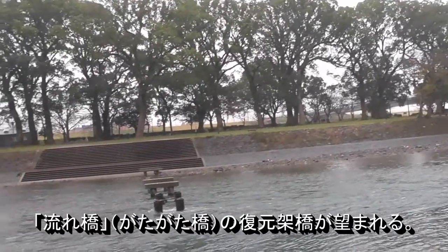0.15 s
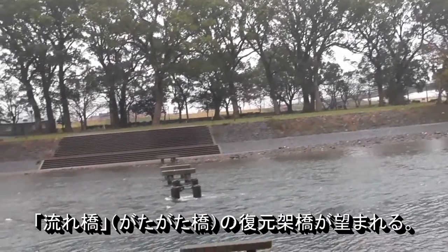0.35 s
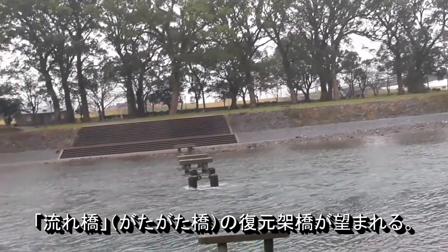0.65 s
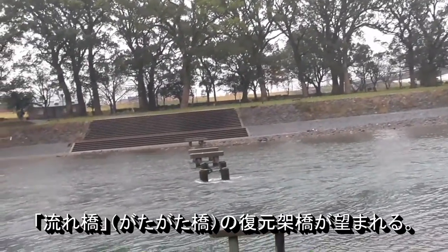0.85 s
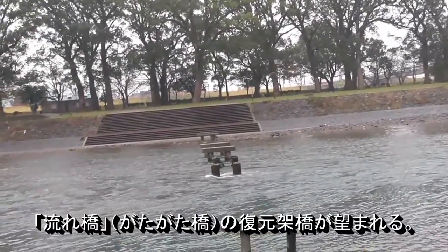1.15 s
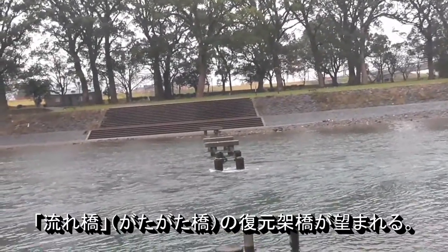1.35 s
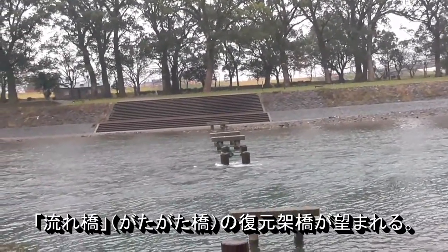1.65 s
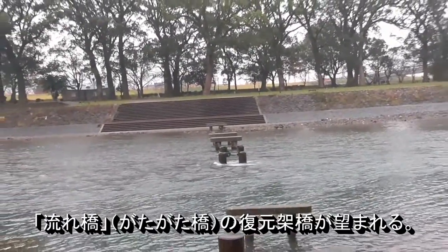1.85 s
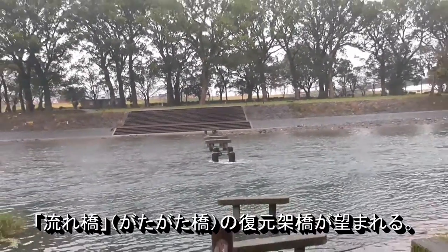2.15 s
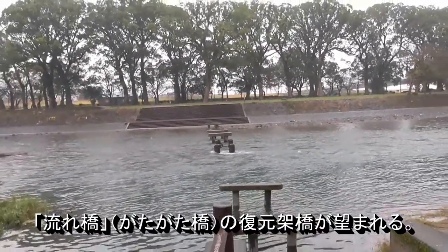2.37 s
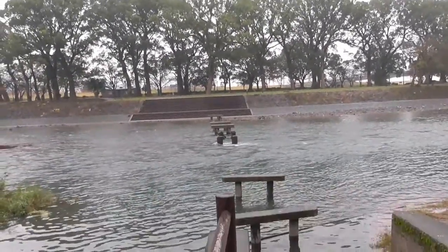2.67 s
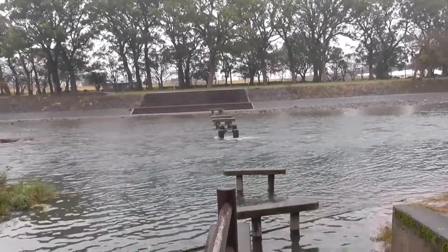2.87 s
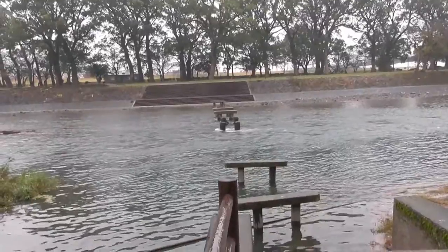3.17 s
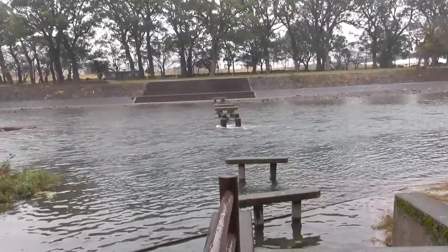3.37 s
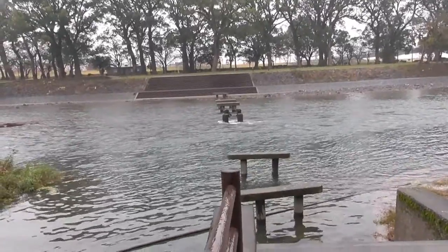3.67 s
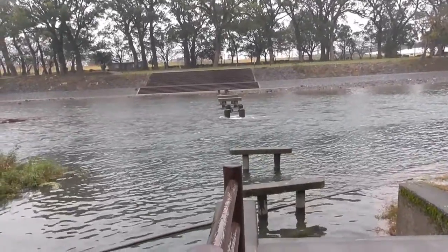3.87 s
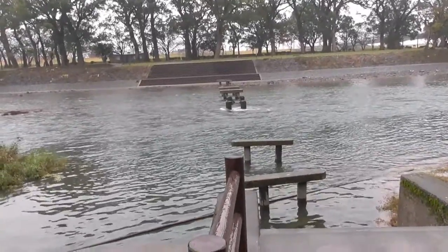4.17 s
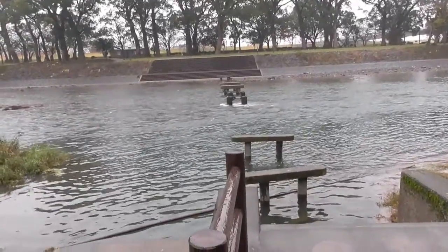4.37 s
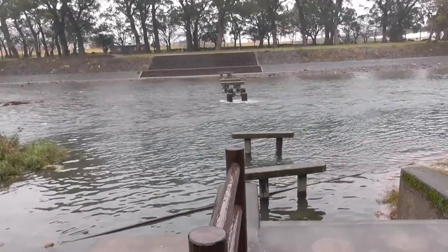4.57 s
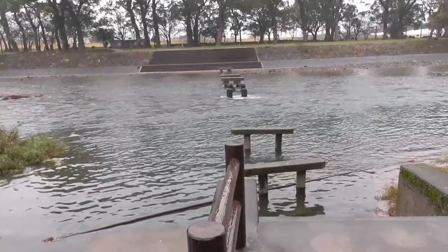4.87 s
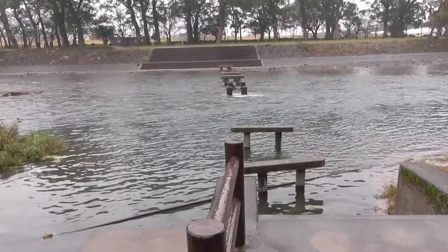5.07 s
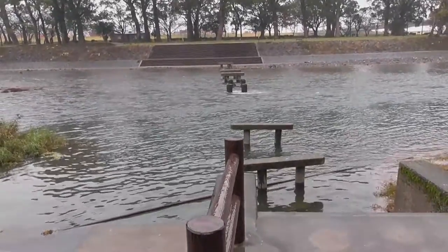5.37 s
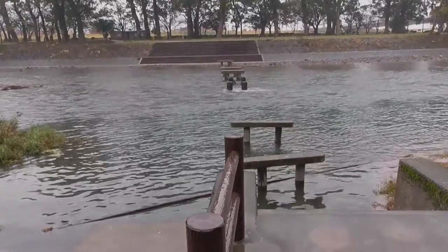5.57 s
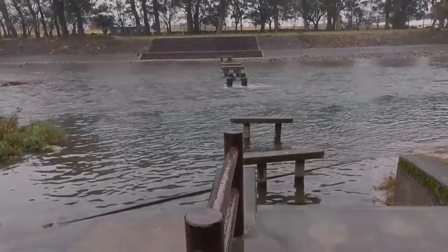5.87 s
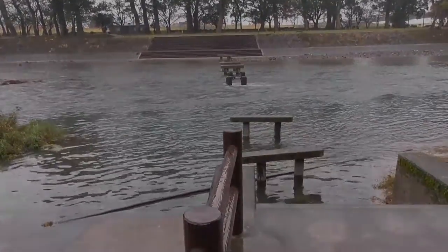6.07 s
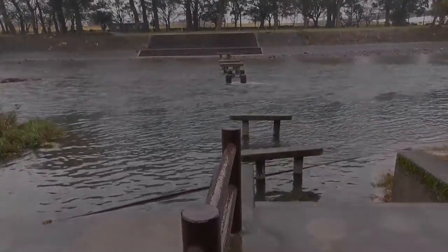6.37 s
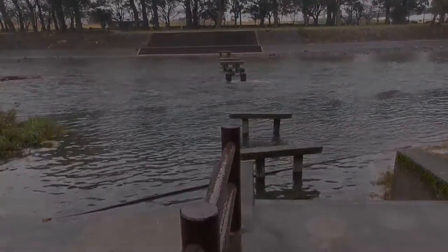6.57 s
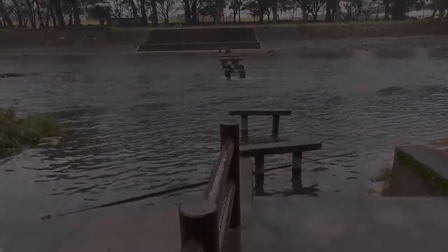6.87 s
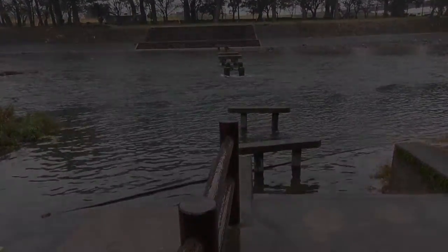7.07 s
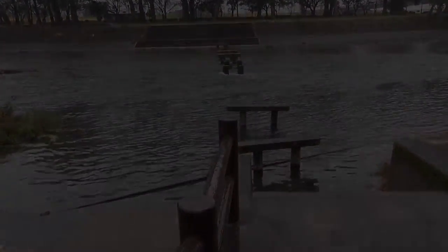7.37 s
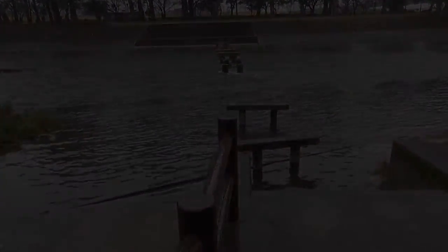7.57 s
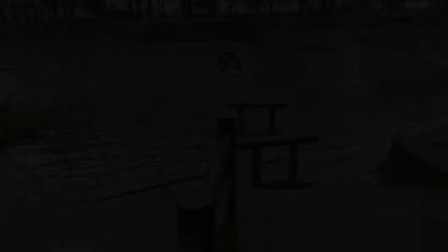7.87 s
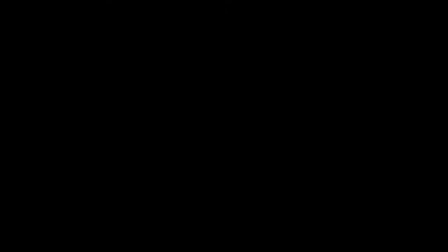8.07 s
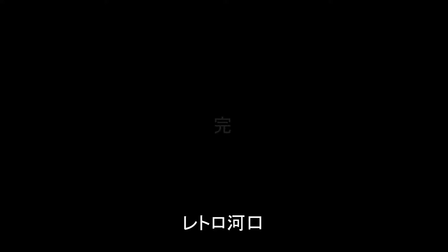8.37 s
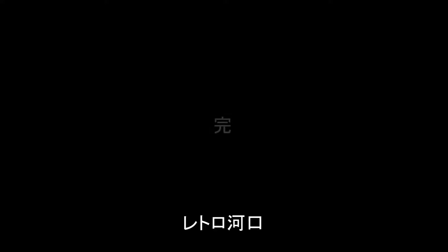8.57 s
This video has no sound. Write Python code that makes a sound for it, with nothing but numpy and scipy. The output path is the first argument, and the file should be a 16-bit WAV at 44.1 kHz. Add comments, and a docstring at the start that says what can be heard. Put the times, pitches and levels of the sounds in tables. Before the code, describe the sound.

A quiet river rushes evenly past posts after a half-second burst of rough handling knocks; one later bump, tiny drips, and a gradual fade-out.

```python
"""River past a footbridge

Broken water roars and spray fizzes round the posts: shaped noise mixed with swarms of ringing bubbles.
Drips ring with rising pitch, a far bird chirps upward, and a faint drone wavers below.
Fingers creak on a hand-held camera at the start and bump it once more later, by stick and slip;
its case ticks in short noise cracks, and soft bumps ring as tones. At the end everything fades out."""
import sys
import numpy as np
from scipy import signal
from scipy.fft import rfft, irfft, next_fast_len
from scipy.io import wavfile
from scipy.ndimage import uniform_filter1d

SR = 44100
rng = np.random.default_rng(int(sys.argv[2]) if len(sys.argv) > 2 else 0)


def inscribe(sig):
    """Save sig as 16-bit PCM at rate SR to the path in sys.argv[1].

    A 1-D sig is mono; a 2-D sig holds one channel per row.
    Samples are clipped to [-1, 1] before scaling.
    """
    pcm = np.round(np.clip(np.atleast_2d(sig).T, -1, 1) * 32767)
    wavfile.write(sys.argv[1], SR, pcm.astype(np.int16))


N = 384993

# relative spectrum of the broken water round the posts: frequency_hz, density_db (per Hz)
ROAR_SPECTRUM = [(15, -52.5), (25, -30), (87, -1.5), (117, -4), (148, -1), (257, -1.5), (399, -3), (531, 0),
                 (721, 0.5), (856, -2.5), (1350, -5), (1700, -16), (2140, -14.5), (2400, -25),
                 (3120, -49.5), (5280, -120)]
# relative spectrum of the spray above it: frequency_hz, density_db (per Hz)
SPRAY_SPECTRUM = [(1410, -36), (2400, -1.5), (3040, -1.5), (3480, 1), (4140, 1.5), (5040, -2), (6530, -12),
                  (8610, -7.5), (9920, -8.5), (11800, -13), (15200, -23), (15800, -24.5)]
# strength of the flow: time_s, roar_gain_db, spray_gain_db
FLOW_STRENGTH = [(0.47, -44.5, -56), (1.18, -44, -56.5), (2.88, -44.5, -57.0), (3.67, -44.5, -55),
                 (3.88, -43.5, -56), (4.08, -44, -56.5), (4.28, -42.5, -54.0), (4.47, -44.0, -55.5),
                 (5.78, -45.5, -57), (5.88, -44, -56.0), (6.17, -46, -57.5), (6.97, -46, -56.7),
                 (7.08, -42, -53.5), (7.58, -42, -54.5)]
# how alike the river is at the two microphone ports: frequency_hz, likeness (0-1)
PORT_LIKENESS = [(60, 0.95), (100, 0.95), (160, 0.89), (270, 0.84), (450, 0.84), (740, 0.9), (1220, 0.77),
                 (2000, 0.75), (3300, .74), (4500, 0.76), (5800, 0.49), (7200, 0.27), (9000, 0.33),
                 (15000, 0.29)]
# level difference of the ports: frequency_hz, left_minus_right_db
PORT_LEAN = [(60, -2.5), (92, -5.5), (140, -4.5), (210, -3.5), (330, -4.5), (500, -3), (770, -3.0),
             (1170, -3.0), (1790, 0), (2740, 0.5), (4190, 0.5), (6410, 0), (9810, -10.5), (15000, -5)]
# phase difference of the ports: frequency_hz, left_leads_rad
PORT_LEAD = [(100, 0), (1600, .1), (2400, -.1), (5200, -.6), (6900, -1.6), (9000, 0)]
# drags of a finger over the camera case, each a run of slips:
# start_s, length_s, slips_per_s, first_slip_db, swell_to_last_slip_db, sharpness_hz, grit_db
FINGER_DRAGS = [(.0425, .01, 160, -26, 1, 500, -55.5), (.0586, 0.015, 160, -10.5, -5, 480, -37),
                (.0774, 0.021, 218, -2.5, -6.5, 510, -34.5), (.0981, 0.0052, 415, -1.5, 5.5, 448, -28),
                (.1098, 0.04, 172, -16.5, 6, 586, -45.5), (.172, 0.035, 180, -20, 4.5, 310, -60),
                (.232, 0.035, 147, -17, -4, 260, -57.5), (.3052, 0.028, 97, -18, 1, 393, -60),
                (.3432, 0.013, 287, -14.5, 5.5, 430, -39.5), (0.356, .058, 218, -18.5, -1.5, 277, -44),
                (3.9043, .012, 95, -11.5, -14, 250, -65)]
# ticks of the camera case: start_s, relative_peak_db, t60_s, brightness_db_per_octave
CASE_TICKS = [(1.1923, -33, 0.0088, 1), (2.819, -41, 0.012, -2.5), (7.087, -40.5, .05, 6.5),
              (7.0934, -36, 0.015, 4), (7.301, -38, 0.003, -2), (7.3108, -37, 0.0072, 5)]
# colour of the case: frequency_hz, level_db
CASE_COLOUR = [(500, -10.5), (1500, 0.5), (2800, -2.5), (4200, 1.5), (6200, -3), (8000, -7.5), (12500, -10),
               (15500, -16.5)]
# soft bumps that reach both ports through the air: start_s, level_db, pitch_hz, t60_s
SOFT_BUMPS = [(1.2065, -19.5, 534, 0.012), (1.54, -24, 778, 0.03), (2.819, -24, 920, 0.013),
              (7.0865, -25, 540, 0.022), (7.111, -30, 610, .03)]
# single drips near the bank: start_s, level_db, starting_pitch_hz, t60_s
BANK_DRIPS = [(2.204, -52, 7350, 0.028), (3.4431, -36, 3900, 0.0072), (4.2303, -30.5, 3950, 0.0046),
              (5.233, -23.5, 4460, 0.0015), (5.538, -38, 1540, 0.023), (5.8167, -33.5, 3160, 0.0094),
              (6.609, -50, 6200, 0.041)]
# phrases of a small bird in the far trees: start_s, length_s, level_db, middle_pitch_hz
BIRD_PHRASES = [(.28, .8, -58, 4030), (2.265, .1, -56, 4000), (7.955, .1, -51, 3900)]

CHIRP_EVERY_S = .272
SLIP_JITTER, SLIP_SCATTER_DB = .2, 2.5  # unevenness of the slips: share of their spacing, and dB
SCRATCH_S, DRAG_DB = .0025, -6.5  # length of a slip's scratch; level of the grit between slips against it
FADE_START_S, FADE_END_S = 6.87, 8.147
EDGE_HZ = 15850


def river():
    """Superposition: turbulent noise and ringing bubbles add, and the flow scales them; drops spatter on the posts."""
    time_s, *levels = np.transpose(FLOW_STRENGTH)
    roar_gain, spray_gain = (amp(np.interp(np.arange(N) / SR, time_s, db)) for db in levels)

    roar = amp(1.06) * water(ROAR_SPECTRUM, patch_db=0.9, flicker_db=0.88, size=2048)
    gurgle = bubbles(343, 2213, per_s=410, cycles=11, spread_db=2.5)
    gurgle = amp(-11.5) * unit(colour(gurgle, ROAR_SPECTRUM))

    spray = water(SPRAY_SPECTRUM, patch_db=1.13, flicker_db=0.8, size=512)
    fizz = bubbles(2500, 13000, per_s=600, cycles=54.5, spread_db=4)
    fizz = amp(-15.5) * unit(colour(fizz, SPRAY_SPECTRUM))
    spatter = bubbles(7000, 13000, per_s=76, cycles=15, spread_db=2.0, count=12)
    spatter = amp(-15) * unit(colour(spatter, SPRAY_SPECTRUM))
    return roar_gain * (roar + gurgle) + spray_gain * (spray + fizz + spatter)


def water(spectrum, patch_db, flicker_db, size):
    """Partial coherence: the ports share part of a noise whose splashes lift patches in time and frequency."""
    hop = size // 4
    hz = np.fft.rfftfreq(size, 1 / SR)
    a, b, c, d, patches = rng.standard_normal((5, N // hop + 5, len(hz)))
    patches = uniform_filter1d(patches, size=12, axis=0)
    patches = unit(uniform_filter1d(patches, size=9, axis=1))
    flicker = unit(uniform_filter1d(rng.standard_normal(len(a)), size=5))[:, None]

    same = np.clip(read(PORT_LIKENESS, hz), 0, .99)
    lean = amp(read(PORT_LEAN, hz) / 2)
    lead = read(PORT_LEAD, hz)
    left = a + 1j * b
    own = c + 1j * d
    right = (same * left + np.sqrt(1 - same ** 2) * own) * np.exp(-1j * lead)
    centre = np.sqrt(lean ** 2 + lean ** -2 + 2 * same * np.cos(lead))  # strength of the two ports summed

    level_db = read(spectrum, hz) + patch_db * patches + flicker_db * flicker
    frames = np.array([left * lean, right / lean]) / centre * amp(level_db)
    x = signal.istft(frames, nperseg=size, noverlap=size - hop, time_axis=1, freq_axis=2)[1][:, :N]
    return x / x.mean(0).std()


def bubbles(low_hz, high_hz, per_s, cycles, spread_db, count=24):
    """Bubble resonance: each size rings at its own pitch, bursts at random times and has its own place."""
    out = np.zeros((2, N))
    for hz in np.geomspace(low_hz, high_hz, count):
        at, strength, side = rng.random((2000, 3))[:int(per_s * N / SR / count)].T
        strength_db = -spread_db * np.log(np.maximum(strength, .02))
        train = np.zeros(N)
        train[(at * N).astype(int)] = amp(strength_db) * np.sign(side - .5)  # random polarity
        sound = signal.oaconvolve(train, ring(hz, cycles / hz, rise=0.037))[:N]
        lean = amp((read(PORT_LEAN, hz) + 2 * rng.standard_normal()) / 2)
        out += np.array([sound * lean, sound / lean])
    return out


def ring(hz, t60, rise=0):
    """Damped oscillation: a tone dies exponentially; a bubble's pitch rises as it nears the surface."""
    t = np.arange(int(t60 * SR)) / SR
    tone = np.sin(2 * np.pi * hz * t * (1 + rise * t / t60))
    return tone * amp(-60 * t / t60) * (1 - np.exp(-t * hz))


def fingers(rasp_db=-32, size=1024):
    """Stick-slip friction: uneven slips drive the ports in opposite directions, and grit scratches with each."""
    thud, grit, half_s = np.zeros(N), np.zeros((2, N)), size / 2 / SR
    scratch = np.hanning(int(SCRATCH_S * SR))
    for start, length, per_s, db, swell_db, hz, grit_db in FINGER_DRAGS:
        steps = np.arange(0, length, 1 / per_s)
        progresses = np.linspace(0, 1, len(steps))
        for step, progress, (late, strength) in zip(steps, progresses, rng.standard_normal((30, 2))):
            loose = np.sin(np.pi * progress)  # the finger grips firmly at both ends of a drag
            s = start + step + loose * SLIP_JITTER * late / per_s
            slip_db = db + swell_db * progress + loose * SLIP_SCATTER_DB * strength
            add(thud, s - half_s, amp(slip_db) * slip(hz))
            add(grit, s - SCRATCH_S / 2, amp(grit_db + SLIP_SCATTER_DB * strength) * scratch)
        add(grit, start, amp(grit_db + DRAG_DB) * signal.windows.tukey(int(length * SR), .5))

    grit = grit * rng.standard_normal((2, N))
    grit += amp(rasp_db) * np.maximum(-thud, 0) * rng.standard_normal(N)  # the skin rasps while it slides
    grit = colour(grit, [(1500, 2), (3000, 1.5), (6000, -3.5), (12500, -1), (14500, -13.5)])
    return thud * amp([[0], [-5.5]]) * [[1], [-1]] + ports(colour(grit, CASE_COLOUR))


def slip(hz, low_cut_hz=175, shell_hz=620, shell_width_hz=350, shell_db=-5, size=1024):
    """Impulse response: a smooth shove, sharper when quick, rocks the case and briefly rings its shell."""
    t = (np.arange(size) - size // 2) / SR
    shove = np.exp(-.5 * (2 * np.pi * hz * t) ** 2)
    rock = signal.sosfilt(signal.butter(3, low_cut_hz, "high", fs=SR, output="sos"), shove)
    shell = signal.lfilter(*signal.iirpeak(shell_hz, shell_hz / shell_width_hz, fs=SR), rock)
    rock = rock + amp(shell_db) * shell
    centred = np.roll(rock, size // 2 - rock.argmin())  # the rebound lies mid-window
    return centred / abs(rock).max() * signal.windows.tukey(size, .5)


def ticks(size=4096):
    """Heavily damped impact: the plastic case cracks as a short burst of noise, partly shared by the ports."""
    out, t = np.zeros((2, N)), np.arange(size) / SR
    for s, db, t60, bright in CASE_TICKS:
        shared, own = rng.standard_normal(size), rng.standard_normal((2, size))
        tilted = [(hz, level + bright * np.log2(hz)) for hz, level in CASE_COLOUR]
        crack = ports(colour(shared + 0.53 * own, tilted))
        crack *= np.exp(-np.log(1000) * t / t60) * (1 - np.exp(-t / 0.00063))
        add(out, s, amp(db + 4.5) * crack / abs(crack).max())
    return out


def bumps():
    """Damped resonance: each soft bump is a dying tone of steady pitch."""
    out = np.zeros(N)
    for s, db, hz, t60 in SOFT_BUMPS:
        add(out, s, amp(db) * ring(hz, t60))
    return out


def drips():
    """Bubble resonance: each drip is a dying tone of rising pitch."""
    out = np.zeros(N)
    for s, db, hz, t60 in BANK_DRIPS:
        add(out, s, amp(db) * ring(hz, t60, rise=0.2))
    return out


def bird(chirp_s=.075, chirp_rise=0.111):
    """Frequency modulation: a tone glides upward, its strength blurred by its way through the trees."""
    out = np.zeros(N)
    u = np.linspace(0, 1, int(chirp_s * SR))
    for start, length, db, hz in BIRD_PHRASES:
        turns = np.cumsum(hz * (1 + chirp_rise * (u - .5))) / SR
        for s in np.arange(start, start + length, CHIRP_EVERY_S):
            blur = unit(uniform_filter1d(rng.standard_normal(SR // 4), size=500))[:len(u)]
            add(out, s, amp(db) * blur * np.sin(np.pi * u) * np.sin(2 * np.pi * turns))
    return out


def drone(hz=95, width_hz=8, db=-62):
    """Narrow-band noise: a small bandwidth makes a faint, far, low drone waver."""
    f = np.fft.rfftfreq(N, 1 / SR)
    band = np.exp(-.5 * ((f - hz) / width_hz) ** 2)
    hum = unit(irfft(rfft(rng.standard_normal(N)) * band, N))
    return amp(db) * hum * amp([[-2], [2]])


def ports(x):
    """Level difference: half the lean goes to each port, which leaves the left one duller."""
    left, right = x
    left = colour(left, [(hz, db / 2) for hz, db in PORT_LEAN])
    right = colour(right, [(hz, -db / 2) for hz, db in PORT_LEAN])
    return np.array([left, right])


def colour(x, points):
    """Linear filtering: the spectrum is multiplied by a table of frequency_hz, level_db."""
    size = x.shape[-1]
    padded = next_fast_len(size + 4096)
    gain = amp(read(points, np.fft.rfftfreq(padded, 1 / SR)))
    return irfft(rfft(x, padded) * gain, padded)[..., :size]


def read(points, hz):
    """Interpolation: a table is read on a log-frequency axis."""
    f, value = np.transpose(points)
    return np.interp(np.log(hz + 1), np.log(f + 1), value)


def add(mix, s, sound):
    """Superposition: a sound is added in place at time s, in seconds."""
    part = mix[..., max(round(s * SR), 0):][..., :sound.shape[-1]]
    part += sound[..., :part.shape[-1]]


def unit(x):
    """Normalisation: the signal is scaled to rms 1."""
    return x / np.sqrt(np.mean(x ** 2) + 1e-20)


def amp(db):
    """Decibel law: 20 dB is a factor of ten in amplitude."""
    return 10 ** (np.asarray(db) / 20)


def scene():
    """Superposition: all sources add; drips, bumps and bird are 2 dB stronger on the right."""
    small_sounds = (drips() + bumps() + bird()) * amp([[-1], [1]])
    return river() + fingers() + ticks() + small_sounds + drone()


def record(dry):
    """Saturation: strong peaks are rounded; then a straight fade to silence and a band limit."""
    rounded = dry / (1 + dry ** 8) ** (1 / 8)
    fade = np.clip((FADE_END_S - np.arange(N) / SR) / (FADE_END_S - FADE_START_S), 0, 1)
    low_pass = signal.firwin(511, EDGE_HZ, window=("kaiser", 9), fs=SR)
    return signal.oaconvolve(rounded * fade, low_pass[None], "same", axes=1)


dry = scene()
out = record(dry)
inscribe(out)
```